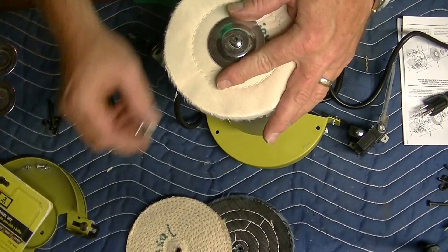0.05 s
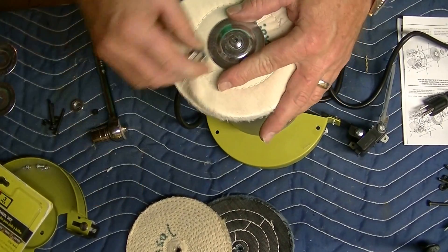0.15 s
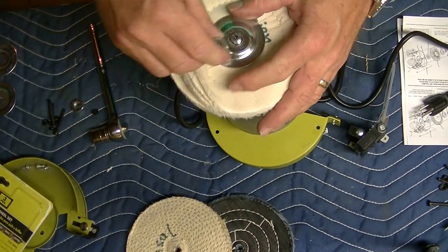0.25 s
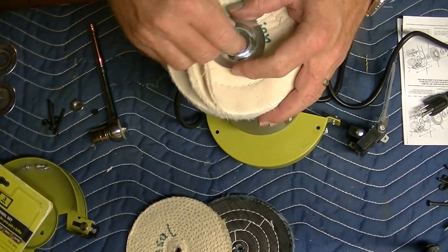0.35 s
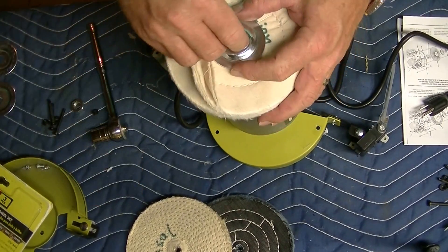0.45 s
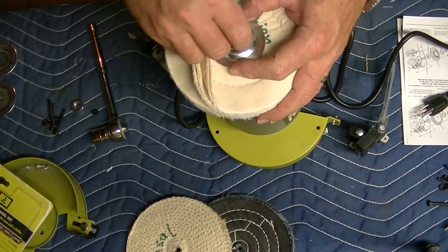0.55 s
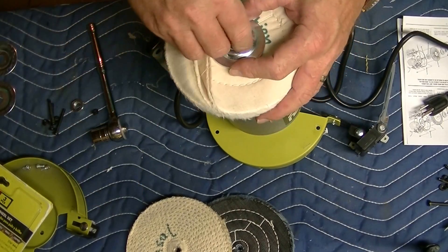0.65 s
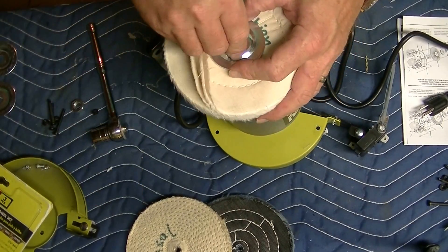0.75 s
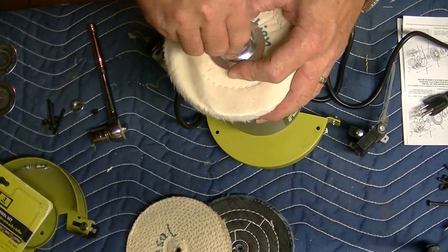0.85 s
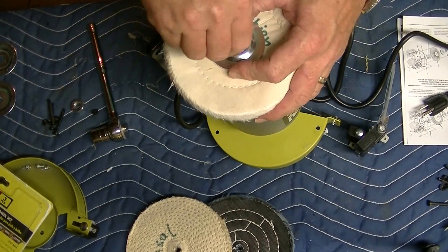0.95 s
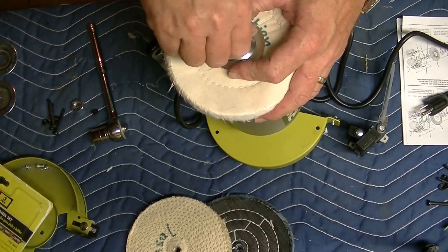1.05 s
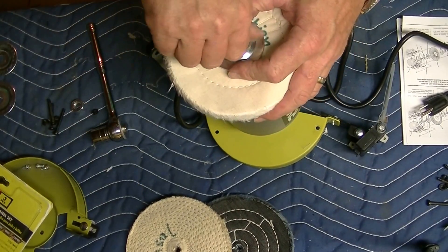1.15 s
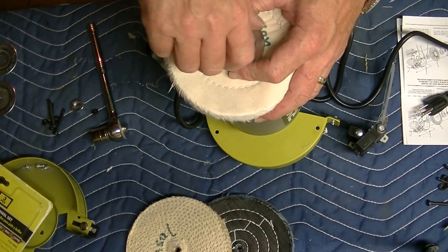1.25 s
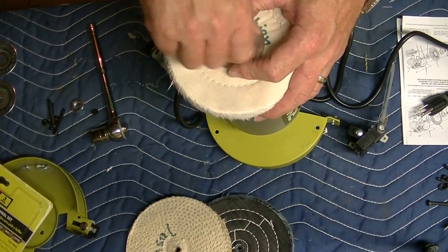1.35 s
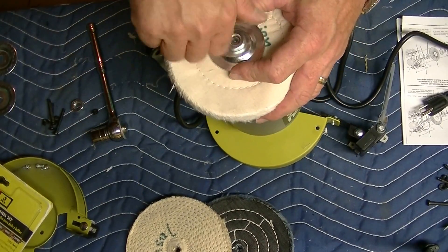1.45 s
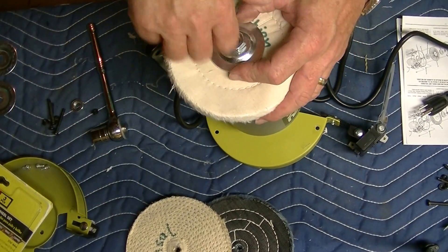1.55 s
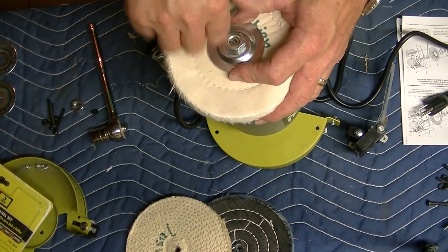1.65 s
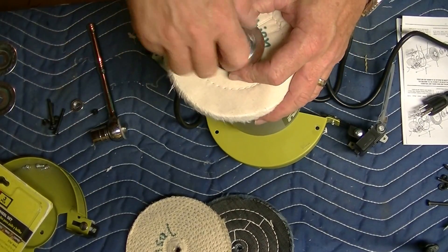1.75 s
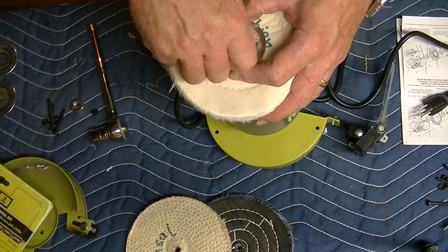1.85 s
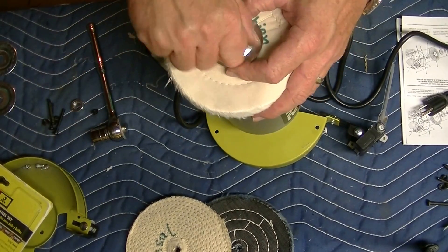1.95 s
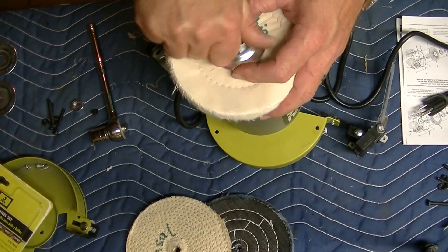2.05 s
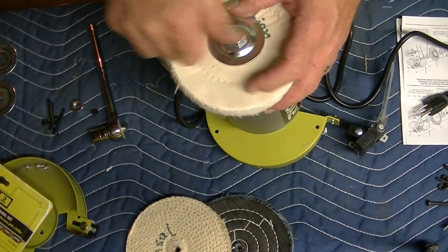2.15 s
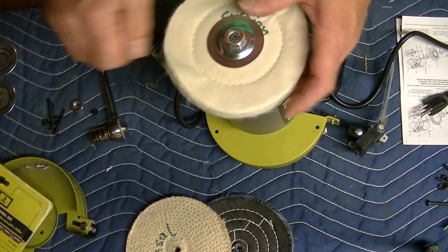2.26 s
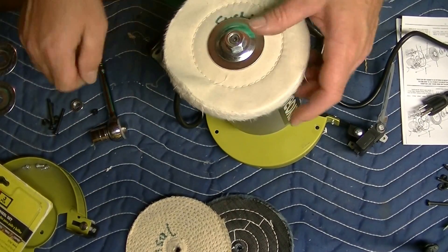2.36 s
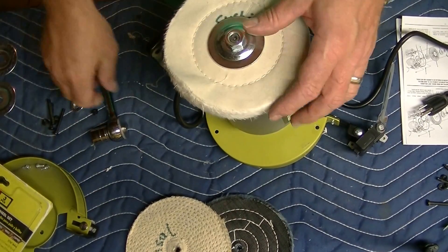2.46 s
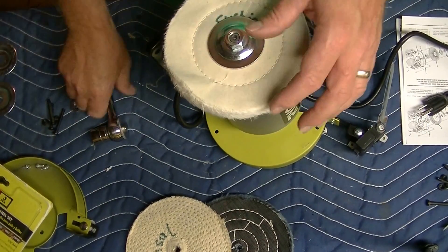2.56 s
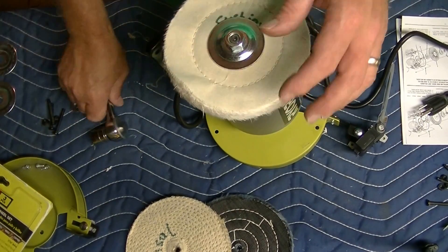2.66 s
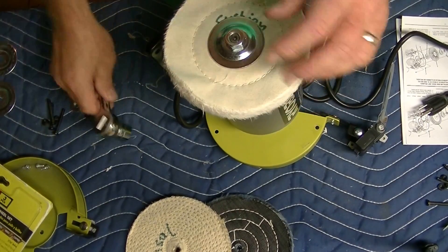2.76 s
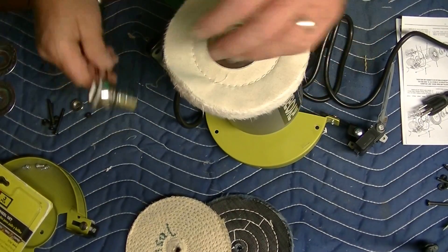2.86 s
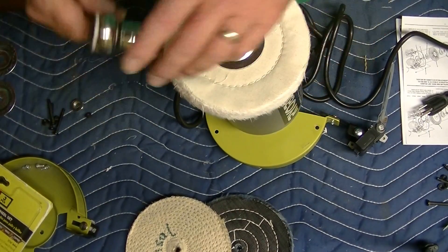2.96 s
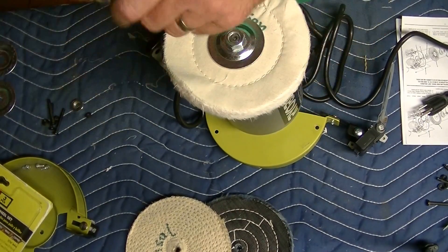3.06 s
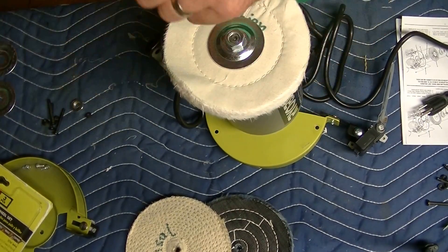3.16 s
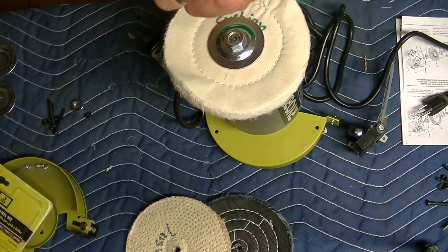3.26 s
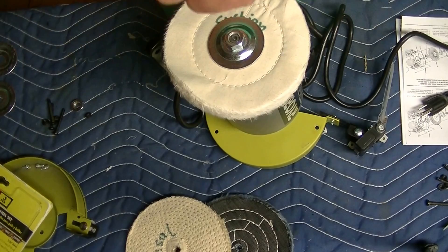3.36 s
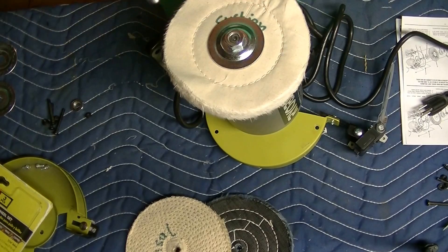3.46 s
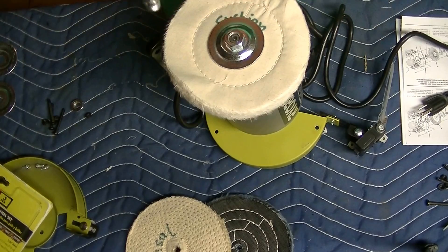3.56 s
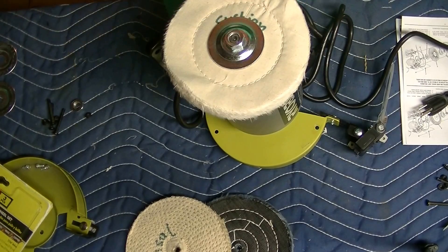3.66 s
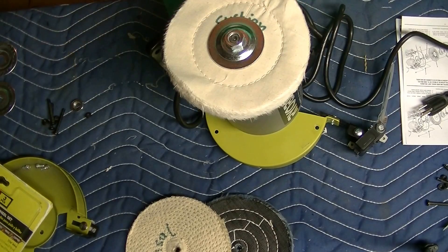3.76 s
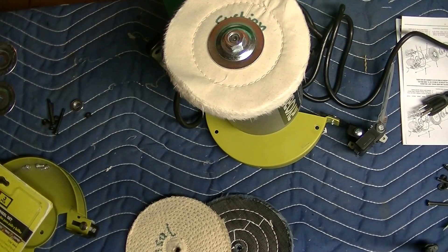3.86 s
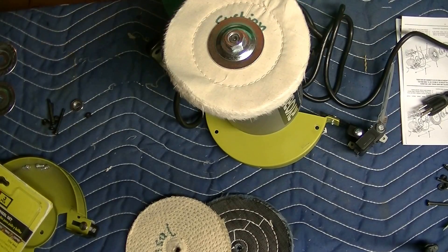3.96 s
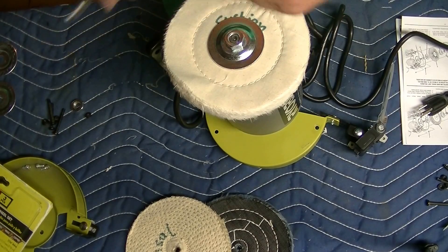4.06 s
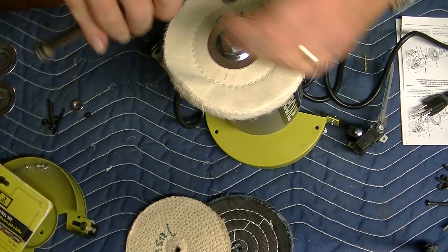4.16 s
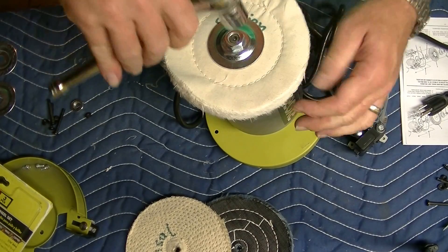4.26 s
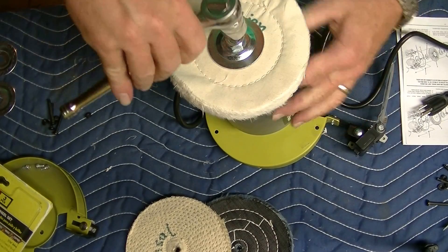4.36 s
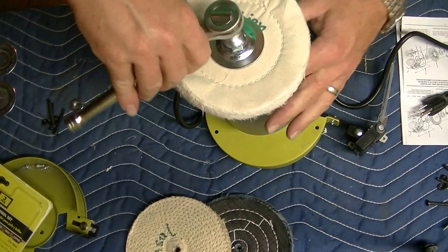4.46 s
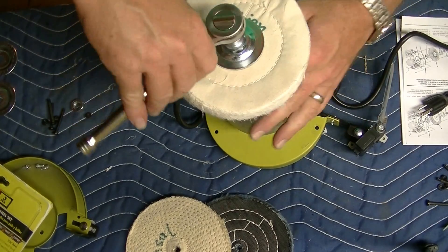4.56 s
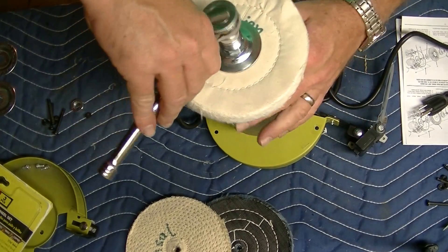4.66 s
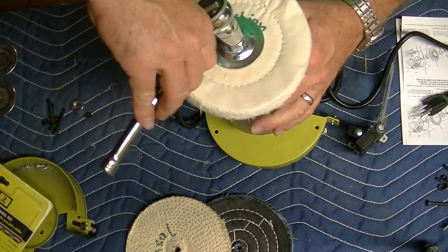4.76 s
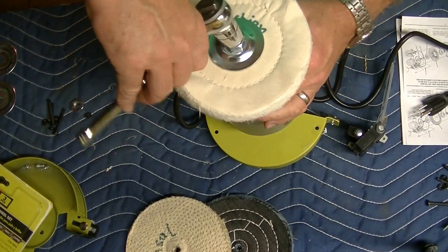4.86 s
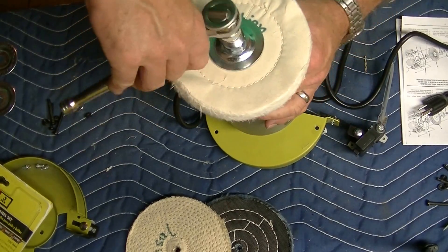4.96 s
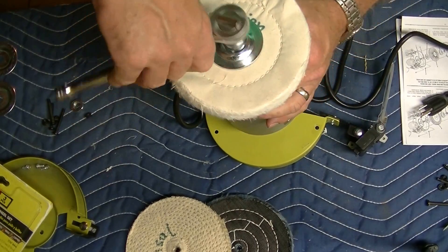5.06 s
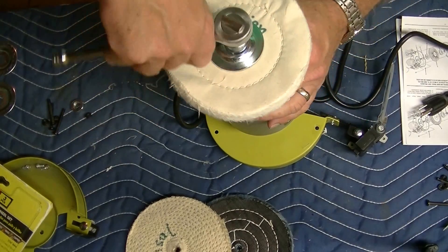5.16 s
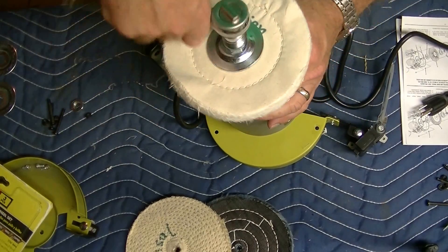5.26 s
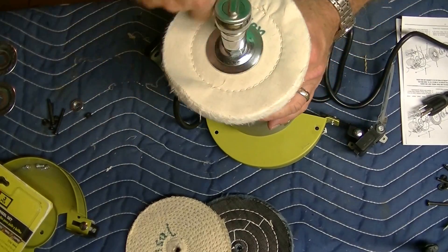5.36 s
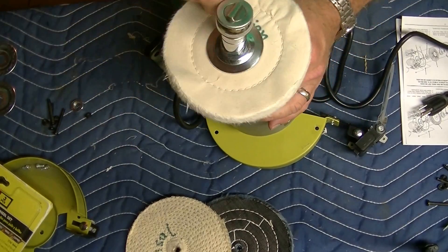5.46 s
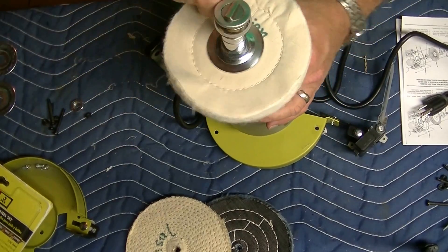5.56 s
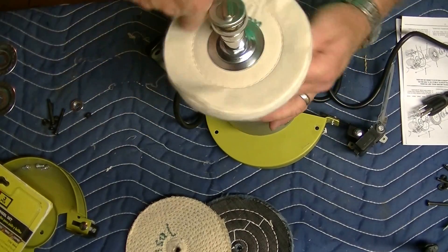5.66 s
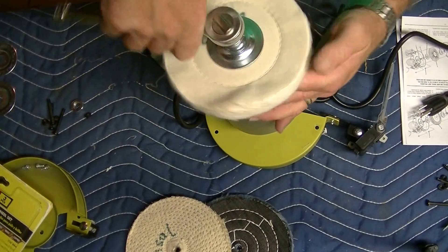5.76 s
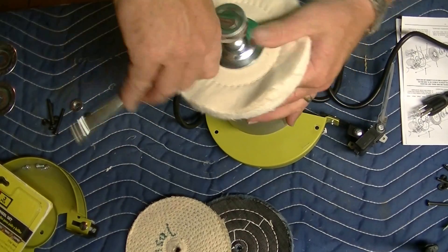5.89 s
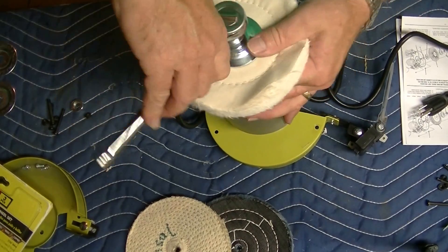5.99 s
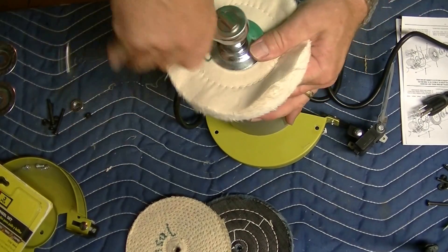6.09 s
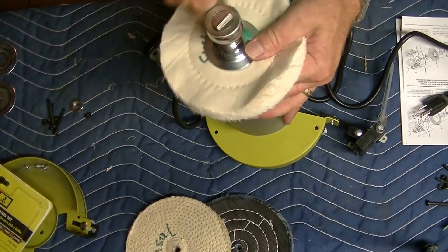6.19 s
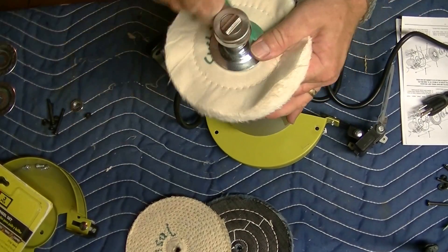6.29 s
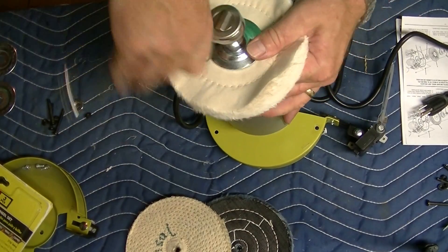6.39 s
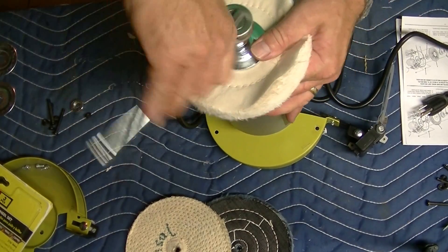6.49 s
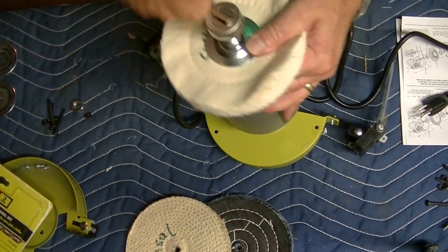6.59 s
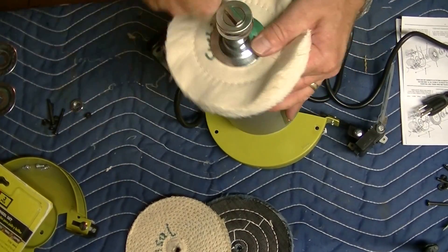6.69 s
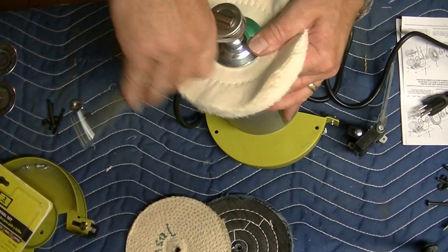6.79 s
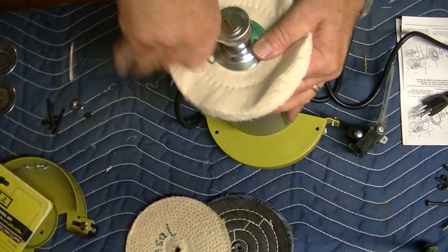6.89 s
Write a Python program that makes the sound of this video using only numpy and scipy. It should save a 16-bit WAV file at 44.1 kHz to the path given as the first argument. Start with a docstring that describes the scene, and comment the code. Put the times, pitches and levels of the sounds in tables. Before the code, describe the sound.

Light metal knocks and soft rubbing lead into a socket clanking onto a nut and quick ratchet strokes in a small workshop.

```python
"""A socket ratchet tightens a nut on a bench grinder's shaft, after the nut is spun on by hand.
On each back-swing the ratchet's catch (the pawl) snaps over a few teeth and rings the steel socket.
Nut, washer and socket knock and scrape. Once the socket sits on the nut, its knocks also thud the
grinder's housing on its padded bench. The hand or a hard snap bumps the grinder with a dull pat.
A nearby camera lens ticks faintly as it focuses, and the small workshop adds a short echo."""
import sys
import numpy as np
from scipy import signal
from scipy.fft import rfft, irfft
from scipy.io import wavfile
from scipy.ndimage import uniform_filter1d

SR = 44100
rng = np.random.default_rng(int(sys.argv[2]) if len(sys.argv) > 2 else 0)


def wrap_up_sound(samples):
    """Save the sound to the file named by the first command line argument, as 16-bit audio."""
    columns = np.atleast_2d(samples).T
    # keep every value between -1 and 1, then stretch to whole-number steps
    tamed = np.clip(columns, -1, 1)
    steps = np.round(tamed * 32767).astype(np.int16)
    wavfile.write(sys.argv[1], SR, steps)


N = 305613
TIME = np.arange(N) / SR
HIT_SAMPLES, SAMPLES_10_MS = 4096, SR // 100
HIT_TIME, HIT_HZ = np.arange(HIT_SAMPLES) / SR, np.fft.rfftfreq(HIT_SAMPLES, 1 / SR)
SOCKET_ON_S, SEATING_S = 4.493, 0.54  # when the socket meets the nut; time taken to press it home

# Levels are relative. A mode is one tone an object rings at; its decay is the time to fade by 60 dB.
# ratchet swings: t/s, length/s, teeth, fastest point (0-1), crack level/dB, ring level/dB,
# loudest group of socket modes, its lead over the others/dB
SWINGS = [(3.6405, 0, 1, 0, -23, -23, 3, 24), (3.9693, 0, 1, 0, -20, -24, 3, 8),
          (4.0144, .052, 6, .66, -22, -14.5, 3, 4.5), (4.085, 0, 1, 0, -23, -31.5, 3, 1),
          (5.955, 0, 1, 0.078, -23, -21.5, 1, 14), (5.9945, 0.0065, 1, 0, -23, -23, 1, 11),
          (6.3392, 0.055, 6, 0.7, -21, -22.5, 1, 5), (6.4192, .0525, 6, .35, -20, -21, 1, 4.5),
          (6.4987, 0, 1, 0, -16, -22, 2, 6), (6.7319, 0.025, 3, 0.76, -21, -18, 1, 6),
          (6.7977, 0.062, 6, 0.33, -22, -20.5, 1, 7)]
# modes of the socket: f/Hz, level/dB, decay/s, group (0-3)
SOCKET_MODES = [(3842, -2, .075, 0), (3540, -10, .05, 0), (4062, -10, .08, 0), (6198, -11, .08, 1),
                (6785, -3.5, .045, 1), (6920, -9, .015, 1), (6778, -13, .2, 1), (9850, -.5, .014, 2),
                (10050, -11, .01, 2), (9842, -17, .21, 2), (10840, -.5, .013, 3), (11000, -10, .01, 3),
                (10900, -20, .17, 3), (14850, -23, .02, 2), (15150, -19, .022, 1), (15600, -22, .015, 2)]
# tone colour of the pawl's dry crack: f/Hz, level/dB
CRACK_COLOUR = [(40, -23.5), (130, -23.5), (400, -21), (800, -20), (1300, -18), (2200, -8.5), (3200, 0),
                (5300, 6.5), (6500, 7.5), (8300, 0), (10700, 4), (12000, -27), (13500, -8), (15500, -13.5)]
# knocks on the shaft: t/s, level/dB, brightness/dB, contact time/s,
# nut mode left free to ring (rounded; none if outside 1-7)
KNOCKS = [(0.4406, -36, 12, 0.0019, 4), (.519, -50, 0, 0.0084, -2), (0.553, -38, -4, 0.009, 5),
          (.6801, -55, -19, 0.0057, -5), (0.7146, -30.5, -1.5, 0.0047, -5), (0.7838, -45.5, -15, 0.005, 1),
          (0.9058, -43, -15, 0.0093, 7), (1.0042, -25, 8.5, .0035, 0), (1.4003, -39, -7, 0.036, 0),
          (1.42, -41, -3, 0.0086, 1), (1.4314, -35.5, -3, 0.0041, 4.5), (1.4988, -36, 5, .0028, -2),
          (1.5032, -30, -4, 0.0088, -5), (1.7564, -54.5, 17, 0.00041, -3), (2.5922, -49.5, 4, 0.0045, -2),
          (2.6302, -46.5, 14, 0.011, 3.5), (3.0576, -26, 26.5, 0.0024, 0.5), (3.541, -53.5, 3, 0.0031, 4),
          (3.9492, -47.5, 22, .0015, -2.5), (3.9583, -38, 37, 0.0011, 1), (4.1468, -27.5, 22, .0014, -4),
          (4.49, -22, 6.5, 0.0025, -2), (4.4967, -19.5, -1, 0.0056, 0), (4.6301, -36.5, -5, 0.0047, 3.5),
          (4.6657, -45.5, -7, 0.0019, 0), (4.6927, -50.5, -17, .003, 3), (4.728, -45, 8, 0.0056, -2.5),
          (4.7827, -43.5, -8, 0.00087, 4.5), (4.9975, -38, 1, 0.0057, -4), (5.003, -36, -7.5, 0.013, -4),
          (5.128, -35.5, 10, 0.00099, 0.5), (5.2538, -35, -7.5, 0.0018, 6), (5.2634, -28, 3.5, 0.0025, -3),
          (5.3457, -29.5, 5, 0.00028, 2), (5.3619, -39, -9, 0.0033, 2.5), (5.4147, -39.5, -8, 0.0049, 7.5),
          (5.4738, -24.5, -1.5, 0.003, -8), (5.6195, -41, 1, 0.0034, 3.5), (5.6409, -32, -9, 0.0045, 3),
          (5.698, -34, 4, 0.0047, -2), (5.7102, -40.5, 26, 0.008, 1), (5.7913, -34.5, 0, .0033, -1),
          (5.8509, -21.5, 2.5, 0.00014, 3), (6.053, -41, -8, .007, 0), (6.239, -36.5, -1.5, 0.007, -2),
          (6.301, -46.5, -17.5, 0.0026, 5), (6.3113, -37.5, -6, 0.0047, -2),
          (6.6493, -50.5, -8, 0.0012, 10), (6.6949, -31.5, 8, 0.0044, 0), (6.7275, -33, 31, 0.0015, 5),
          (6.885, -32.5, -4, 0.0065, -3), (6.9126, -27, 9, .0033, -16)]
# tone colour of a knock on the shaft: f/Hz, level/dB
STEEL_COLOUR = [(60, -25), (140, -20.5), (400, 0), (650, 3.5), (950, 12.5), (1300, 4.5), (1650, 0),
                (2250, 9.5), (3000, 3.5), (4000, 6), (5400, 8), (6600, -1.5), (7800, 1), (9500, 2.5),
                (11200, -1.5), (13000, -13), (15500, -13.5)]
# modes of nut and washer: f/Hz, level/dB, decay/s
NUT_MODES = [(2260, -11, .09), (3271, -11, 0.43), (4140, -4.5, .12), (4830, -9, 0.063), (5450, -4, 0.067),
             (8800, -6, .11), (11460, -15, 0.12)]
# modes of the grinder's housing: f/Hz, level/dB, decay/s
HOUSING_MODES = [(170.8, 3, 0.31), (202, 7.5, .11), (257, 1, 0.13), (510, -1, 0.13), (803, 1, 0.15)]
# dull bumps of the grinder, from the hand or a hard ratchet snap: t/s, thud level/dB, pat level/dB
BUMPS = [(.267, -68, -57), (.773, -71, -57), (0.924, -70, -72), (1.817, -73, -61), (2.02, -81, -58),
         (2.045, -75, -55.5), (2.109, -73, -71), (2.23, -70, -63.5), (2.602, -56, -63), (6.177, -63, -60),
         (6.523, -56.5, -46)]
# slides of fingers, cloth wheel and screw thread: t/s, length/s, level/dB
SLIDES = [(0.242, 0.066, -70.5), (.49, 0.11, -64.5), (0.757, 0.48, -59.5), (1.363, 0.053, -51.5),
          (1.451, 0.14, -62), (1.76, 0.11, -63), (1.934, 0.15, -60.5), (2.585, 0.041, -56.5),
          (2.634, 0.24, -61), (2.963, 0.11, -59), (4.139, .35, -66), (4.59, 0.087, -53.5),
          (4.969, 0.77, -54), (5.644, 0.077, -48), (5.754, 0.56, -58), (6.553, 0.43, -53)]
# tone colour of rubbing: f/Hz, level/dB
RUB_COLOUR = [(60, -37.5), (400, -20), (1000, -14.5), (1600, -8), (2400, -3), (3300, 1.5), (4700, 3.5),
              (6000, 2), (8000, -12.5), (11000, -13), (15000, -25)]
# faint song of the sliding washer: t/s, f/Hz, level/dB
WASHER_SONG = [(2.78, 4170, -77), (2.86, 4130, -64), (2.929, 4080, -56.5), (3, 4140, -63),
               (3.08, 4330, -95)]
# whisper of the coasting shaft: t/s, f/Hz, level/dB
SHAFT_SONG = [(4.1, 5000, -88), (4.2, 4950, -54), (4.33, 4740, -57.5), (4.45, 4850, -55), (4.55, 4770, -82)]
# lens motor runs: t/s, length/s, level/dB, extra on the first step/dB, every second step early by/s
FOCUS_RUNS = [(0.801, .08, -56.5, 6, 0.0036), (.978, .72, -56, 1.5, 0.0037), (2.821, .55, -58, 6.5, 0),
              (3.741, .21, -65.5, -8, 0)]
# modes of one lens motor step: multiple of its pitch, level/dB, decay/s
TICK_MODES = [(.73, -4, .015), (.86, -5, .013), (1.06, -2, .014), (1.2, -5, .013)]
# echoes off wheel, bench and camera: delay/s, gain
ECHOES = [(.0017, 0.066), (.0034, -0.11), (.0058, 0.096), (.0083, .2), (.0096, 0.13)]
# how long the workshop rings: f/Hz, decay/s
ROOM_DECAY = [(200, 0.47), (700, 0.1), (2000, 0.38), (5000, 0.29), (9000, 0.3), (14000, 0.095)]
# room sound that differs between left and right: f/Hz, level/dB
ROOM_WIDTH = [(100, -11.5), (300, 0.5), (600, 3), (1200, -9.5), (2500, -9), (5000, -22), (10000, -20)]
# tone colour of the background noise: f/Hz, level/dB
BACKGROUND_COLOUR = [(25, -24.5), (60, -17.5), (110, -24.5), (200, -11.5), (420, -5.5), (700, -12),
                     (1150, -11.5), (1700, -7), (2600, -3), (4000, -9.5), (5400, -5), (8000, -6),
                     (12000, -12), (16000, -17.5)]
# how alike that noise is left and right: f/Hz, likeness (0-1)
BACKGROUND_LIKENESS = [(60, .1), (400, 0.059), (1200, 0.033), (2500, 0.062), (6000, 0.32), (15000, 1)]


def ratchet(crack_s=0.0042, rise_s=0.00076, detune=0.0058, spread_db=6, double_speed_db=5):
    """Each snap of the pawl cracks and rings the socket, whose modes shift a little with the grip."""
    out, t = np.zeros(N), np.arange(SR // 4) / SR
    swell = 1 - np.exp(-t / rise_s)
    crack_colour = look_up(CRACK_COLOUR, HIT_HZ)
    for start_s, length_s, count, fastest, crack_db, ring_db, loudest, lead_db in SWINGS:
        group_db = ring_db - lead_db * (np.arange(4) != loudest)
        damping = 1
        if start_s < SOCKET_ON_S:  # off the nut, the ring is thinner and shorter
            group_db[0] -= 14
            damping = 1.3
        for s, speed in teeth(start_s, length_s, count, fastest):
            add(out, s, gain(crack_db - 1) * contact(crack_s, crack_colour, chatter=3.5))
            snap_db = group_db + double_speed_db * np.log2(speed) + spread_db * rng.uniform(-1.06, 1, 4)
            for hz, mode_db, t60, group in SOCKET_MODES:
                shifted_hz = hz * (1 + detune * rng.standard_normal())
                ring = unit_energy(swell * mode(shifted_hz, t60 / damping, t))
                add(out, s, gain(snap_db[group] + mode_db) * ring)
    return out


def teeth(start_s, length_s, count, fastest, slowing=2):
    """Time and relative speed at each tooth, as the hand speeds up and slows down."""
    if count < 2:
        return [(start_s, 1)]
    progress = (np.arange(count - 1) + .5) / (count - 1)
    gaps = 1 + slowing * (progress - fastest) ** 2
    times = start_s + length_s * np.r_[0, np.cumsum(gaps)] / gaps.sum()
    return zip(times, 1 / np.r_[gaps[0], gaps])


def knocks(clean_touch_s=0.00054, ring_db=-6, held_db=-14, held_t60=.03, seated_db=-5, spread_db=2):
    """Steel hits steel: short touches click, long ones scrape. Hand and socket muffle the nut's ring."""
    out, t = np.zeros(N), np.arange(SR // 5) / SR
    for s, db, bright_db, length_s, free_mode in KNOCKS:
        colour = knock_colour(s, bright_db, length_s)
        add(out, s, gain(db - 1.5) * contact(length_s, colour, chatter=length_s / clean_touch_s))
        for number, (hz, mode_db, t60) in enumerate(NUT_MODES, start=1):
            held = number != round(free_mode)
            ring = unit_energy(mode(hz, held_t60 if held else t60, t))
            muffle_db = held_db * held + seated_db * seated(s)
            chance_db = spread_db * rng.standard_normal()
            add(out, s, gain(db + ring_db + mode_db + muffle_db + chance_db) * ring)
    return out


def knock_colour(s, bright_db, length_s, graze_s=0.0017):
    """A knock's dB at each frequency: bright ones trade clank for treble; a seated socket adds bass."""
    bass = look_up([(1100, 1), (1500, 0.089)], HIT_HZ)
    clank = look_up([(1100, 0.11), (1500, 0.96), (2400, 0.82), (3200, 0.21)], HIT_HZ)
    treble = look_up([(6300, 0.097), (9000, 0.78)], HIT_HZ)
    graze_db = -3.5 * max(np.log2(graze_s / length_s), 0)  # a very brief touch leaves a thin clink
    bass_db = -36 + 13 * seated(s) + graze_db - 0.37 * bright_db
    clank_db = -7.5 + graze_db - bright_db
    treble_db = -22.5 + graze_db + bright_db
    return look_up(STEEL_COLOUR, HIT_HZ) + bass_db * bass + clank_db * clank + treble_db * treble


def seated(s):
    """How firmly the socket sits on the nut at time s, from 0 to 1."""
    return np.clip((s - SOCKET_ON_S) / SEATING_S, 0, 1)


def housing(level_db=-2, rise_s=0.014, detune=0.016, spread_db=3.5, loose_db=-14, lag_s=0.0075):
    """The heavy body thuds after bumps and knocks through the socket; the grip varies its modes."""
    out, t = np.zeros(N), np.arange(SR // 2) / SR
    swell = 1 - np.exp(-t / rise_s)
    jolts = [(s + lag_s, min(-45 + 0.54 * db, -61) + loose_db * (1 - seated(s)))
             for s, db, *_ in KNOCKS if s > SOCKET_ON_S]
    for s, db, *_ in BUMPS + jolts:
        for hz, mode_db, t60 in HOUSING_MODES:
            strength, shift = rng.uniform(-1.37, 1, 2)
            ring = swell * mode(hz * (1 + detune * shift), t60, t)
            add(out, s, gain(db + level_db + mode_db + spread_db * strength) * ring)
    return out


def pats(contact_s=0.0056):
    """Each bump of the grinder, from the hand or a hard ratchet snap, starts with a dull pat."""
    out = np.zeros(N)
    dull_db = look_up([(1100, -9.5), (1600, 3), (3200, -2.5), (9000, -8.5)], HIT_HZ)
    colour = look_up(STEEL_COLOUR, HIT_HZ) + dull_db
    for s, _, db in BUMPS:
        add(out, s, gain(db - 1) * contact(contact_s, colour, chatter=2.3))
    return out


def rattle(level_db=1, spread_db=3, bright_db=-10, contact_s=0.009, touches=3):
    """During each slide the loose parts touch lightly at random moments."""
    out = np.zeros(N)
    for start_s, length_s, db in SLIDES:
        for progress, strength in rng.random((touches, 2)):
            s = start_s + progress * length_s
            touch = contact(contact_s, knock_colour(s, bright_db, contact_s), chatter=0.83)
            add(out, s, gain(db + level_db + spread_db * (2 * strength - 1)) * touch)
    return out


def rubbing(level_db=-2, grain_db=3, rise_s=0.0083, fade_s=0.061):
    """Friction hiss swells with each slide, catching and slipping in grains of a few milliseconds."""
    power = gain(-65) ** 2  # between slides the hands still rustle
    for s, length_s, db in SLIDES:
        rise = np.clip((TIME - s) / rise_s, 0, 1)
        fade = np.exp(-np.maximum(TIME - s - length_s, 0) / fade_s)
        power = power + (gain(db) * rise * fade) ** 2
    grain = uniform_filter1d(rng.standard_normal(N), size=160)
    return noise(RUB_COLOUR) * np.sqrt(power) * gain(level_db + grain_db * grain / grain.std())


def singing(curve, width_hz):
    """Steel sliding on steel keeps one wavering, drifting tone going."""
    s, hz, db = np.transpose(curve)
    jitter = rng.standard_normal(N) + 1j * rng.standard_normal(N)
    wobble = signal.sosfilt(signal.butter(2, width_hz, fs=SR, output="sos"), jitter)
    phase = 2 * np.pi * np.cumsum(np.interp(TIME, s, hz)) / SR
    song = (wobble * np.exp(1j * phase)).real
    return song / song.std() * gain(np.interp(TIME, s, db))


def lens(steps_per_s=30, strong_hz=2100, weak_hz=2350, weak_db=-2, spread_db=1.5, detune=0.069):
    """The focus motor ticks strong and weak in turn; neighbouring modes swing against each other."""
    out = np.zeros(N)
    for start_s, length_s, db, first_db, early_s in FOCUS_RUNS:
        for step in range(int(length_s * steps_per_s) + 1):
            weak = step % 2
            hz = (weak_hz if weak else strong_hz) * (1 + detune * rng.standard_normal())
            ring = sum((-1) ** k * gain(mode_db) * mode(hz * multiple, t60, HIT_TIME)
                       for k, (multiple, mode_db, t60) in enumerate(TICK_MODES))
            step_db = db + first_db * (step == 0) + weak_db * weak + spread_db * rng.standard_normal()
            s = start_s + step / steps_per_s - early_s * weak
            add(out, s, gain(step_db - 1) * unit_energy(ring))
    return out


def workshop(sound, reverb_db=-7):
    """Near echoes and the room's ring reach two close microphones, most alike in the treble."""
    shared = sound + gain(reverb_db) * signal.fftconvolve(sound, room_ring())[:N]
    for delay_s, strength in ECHOES:
        add(shared, delay_s, strength * sound)
    side = signal.fftconvolve(sound, room_ring())[:N]
    width = gain(look_up(ROOM_WIDTH, np.fft.rfftfreq(2 * N, 1 / SR)))
    side = irfft(rfft(side, 2 * N) * width)[:N]
    return np.array([shared + side, shared - side])


def room_ring(early_db=9, early_s=0.014, gap_s=0.0011):
    """The room's answer to a click: strong scatter from near things, then each band fades away."""
    hz, t, bands = signal.stft(rng.standard_normal(SR // 2), SR, nperseg=256)
    fade = gain(-60 * t / look_up(ROOM_DECAY, hz)[:, None])
    scatter = 1 + gain(early_db) * np.exp(-t / early_s)
    ring = signal.istft(bands * fade * scatter, SR, nperseg=256)[1]
    onset = 1 - np.exp(-(np.arange(len(ring)) / SR / gap_s) ** 2)
    spectrum = rfft(ring * onset)
    spectrum /= np.sqrt(uniform_filter1d(abs(spectrum) ** 2, size=150))  # equal energy in every band
    ring = irfft(spectrum)[:SR // 3]
    return ring / np.linalg.norm(ring)


def background(level_db=-63):
    """The quiet room and microphone hiss, partly alike left and right."""
    likeness = np.clip(look_up(BACKGROUND_LIKENESS, np.fft.rfftfreq(N, 1 / SR)), -1, 1)
    left, other = noise(BACKGROUND_COLOUR), noise(BACKGROUND_COLOUR)
    right = irfft(likeness * rfft(left) + np.sqrt(1 - likeness ** 2) * rfft(other), N)
    return gain(level_db) * np.array([left, right])


def contact(length_s, colour_db, chatter):
    """A first touch, then a dying chatter of tiny ones; scaled to level 1 between 2.8 and 8 kHz."""
    grit = rng.standard_normal(HIT_SAMPLES) * np.exp(-HIT_TIME / max(length_s, 1e-4))
    force = chatter * grit / np.linalg.norm(grit)
    force[0] += 1
    log_gain = np.log(gain(np.r_[colour_db, colour_db[-2:0:-1]]))
    tone_filter = np.exp(np.conj(signal.hilbert(log_gain)))  # rings only after the touch
    spectrum = rfft(force) * tone_filter[:len(HIT_HZ)]
    band = spectrum[(HIT_HZ > 2800) & (HIT_HZ < 8000)]
    return irfft(spectrum) / np.sqrt(2 * np.sum(abs(band) ** 2) / HIT_SAMPLES / SAMPLES_10_MS)


def mode(hz, t60, t):
    """One vibration that fades by 60 dB in t60 seconds."""
    return np.sin(2 * np.pi * hz * t) * np.exp(-np.log(1000) * t / t60)


def noise(colour):
    """Steady noise of level 1 with the given tone colour."""
    shape = gain(look_up(colour, np.fft.rfftfreq(N, 1 / SR)))
    hiss = irfft(rfft(rng.standard_normal(N)) * shape, N)
    return hiss / hiss.std()


def unit_energy(hit):
    """Gives a hit the energy of 10 ms of sound at level 1."""
    return hit / np.sqrt(np.sum(hit ** 2) / SAMPLES_10_MS + 1e-20)


def gain(db):
    """Turns decibels into a multiplier."""
    return 10 ** (np.asarray(db) / 20)


def look_up(points, hz):
    """Reads between the rows of a table (f/Hz, value), with octaves evenly spaced."""
    f, value = np.transpose(points)
    return np.interp(np.log(hz + 1), np.log(f), value)


def add(mix, s, sound):
    """Lays a sound into the mix at s seconds."""
    part = mix[max(round(s * SR), 0):][:len(sound)]
    part += sound[:len(part)]


def scene():
    """All the work at the grinder, heard in the room over the quiet background."""
    slides = rubbing() + rattle() + singing(WASHER_SONG, width_hz=150) + singing(SHAFT_SONG, width_hz=450)
    sources = ratchet() + knocks() + lens() + housing() + pats() + slides
    return workshop(sources) * gain([[-.8], [-.5]]) + background()


def record(dry, ceiling=0.7, lopsided=.009, cutoff_hz=15900):
    """The loudest snaps round off at the input's ceiling, then the highest treble is cut."""
    rounded = dry / (1 + (dry / ceiling) ** 6) ** (1 / 6)
    rounded = rounded + lopsided * rounded ** 2  # uneven rounding adds a low puff
    low_pass = signal.firwin(601, cutoff_hz, window=("kaiser", 6), fs=SR)
    return signal.oaconvolve(rounded, low_pass[None], "same")


dry = scene()
out = record(dry)
wrap_up_sound(out)
```